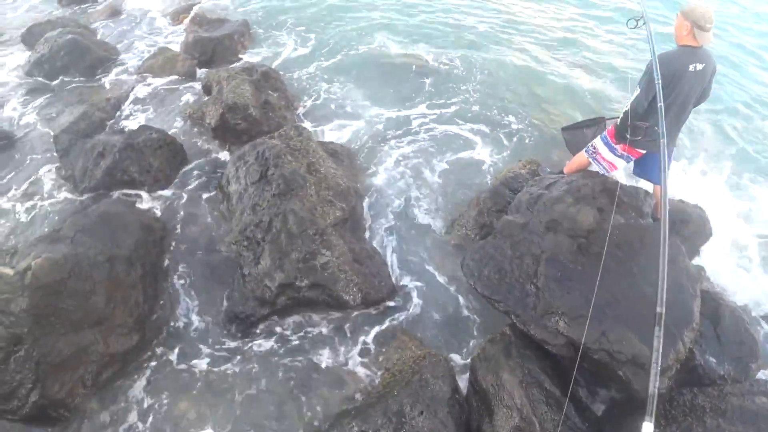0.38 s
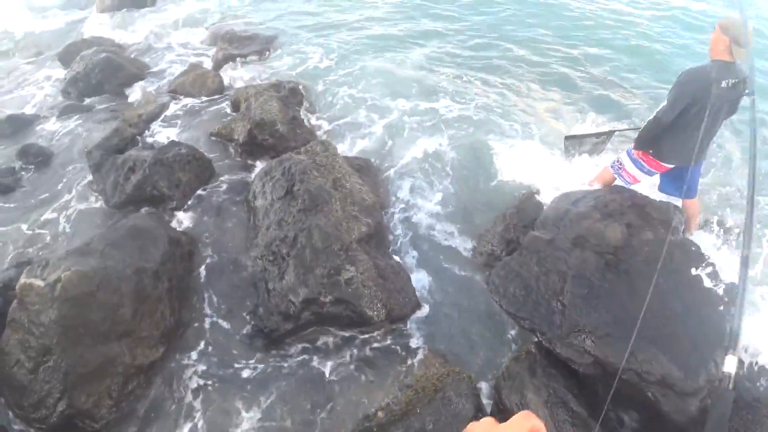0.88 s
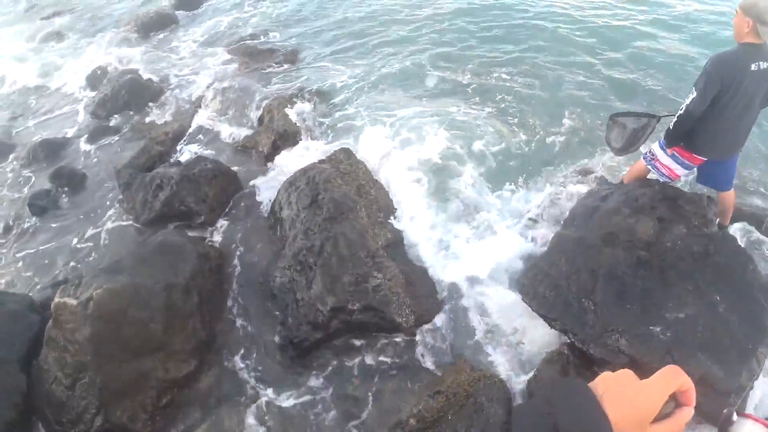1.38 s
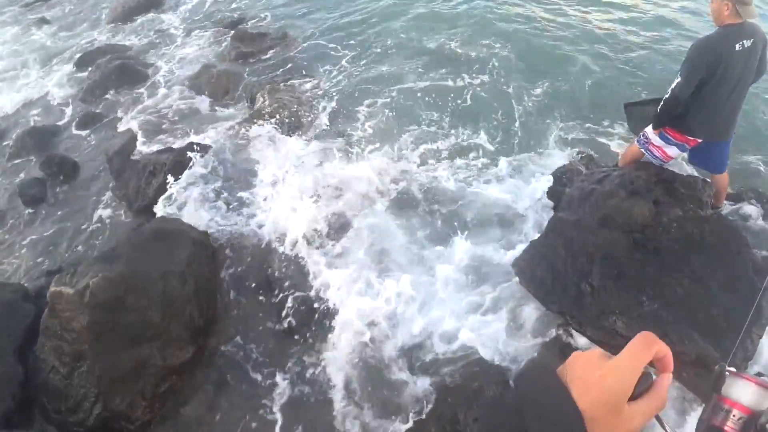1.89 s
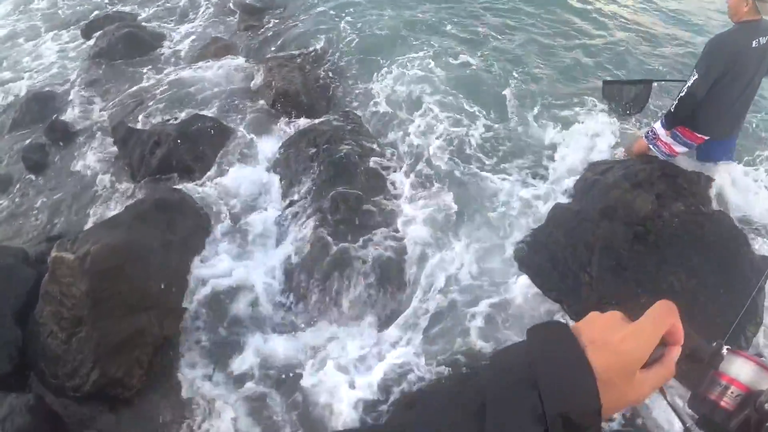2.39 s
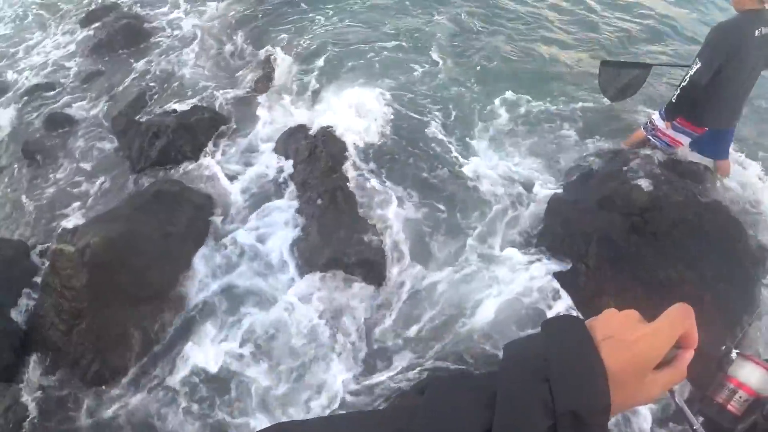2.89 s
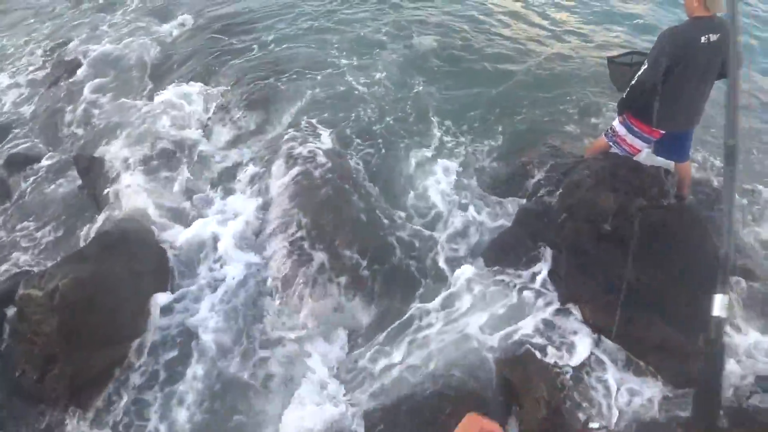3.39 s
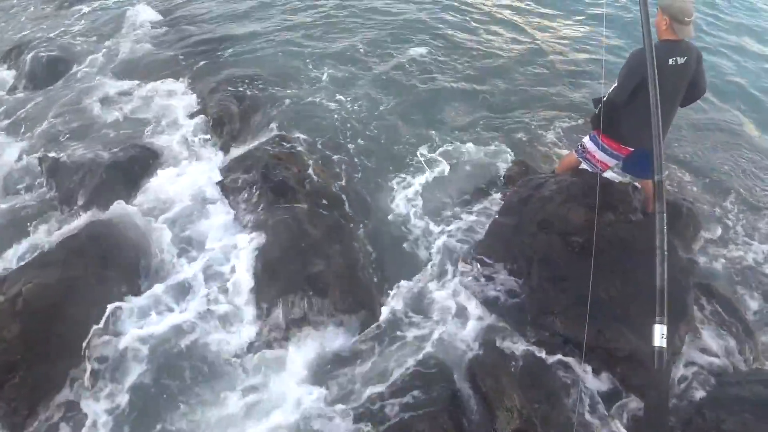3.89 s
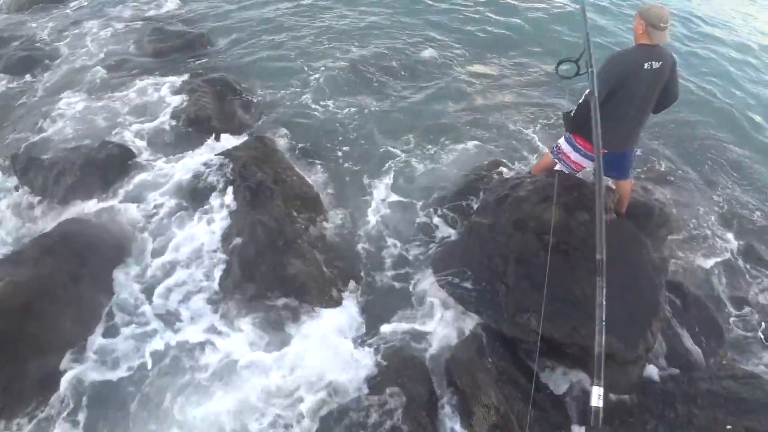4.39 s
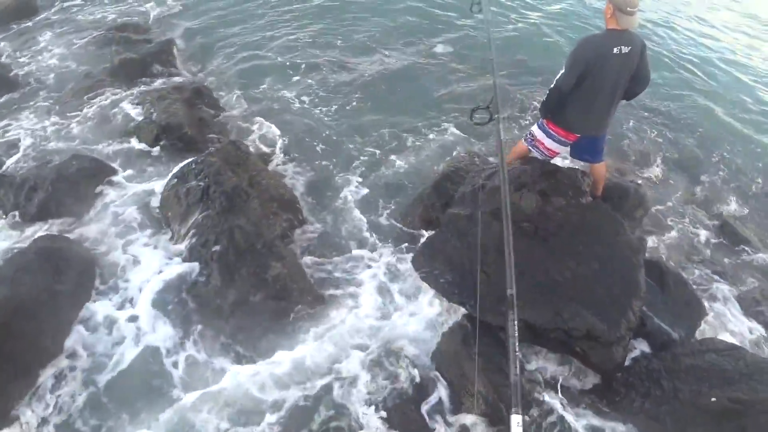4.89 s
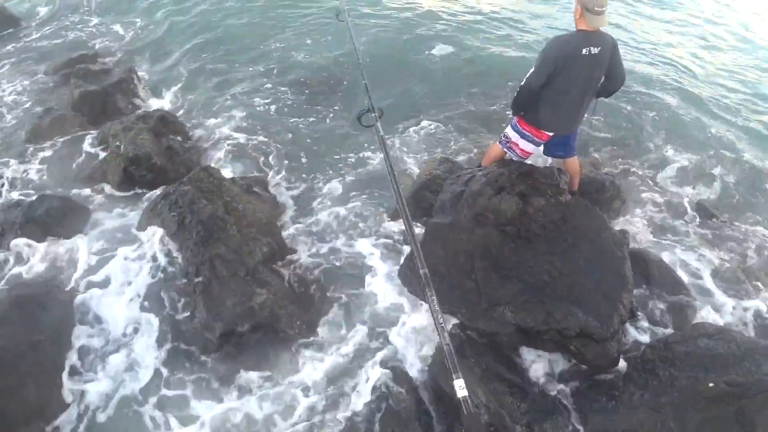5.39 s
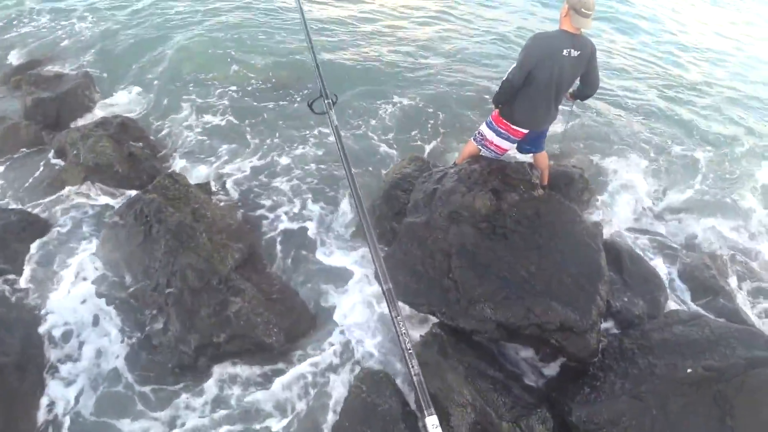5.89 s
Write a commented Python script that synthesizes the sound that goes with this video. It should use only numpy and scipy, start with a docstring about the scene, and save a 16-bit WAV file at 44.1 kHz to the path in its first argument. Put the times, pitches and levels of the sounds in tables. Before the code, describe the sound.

Close surf churns and fizzes among rocks over a smooth distant roar. It starts fairly quiet, builds within a second or so into splashy foam with short slaps, peaks near two seconds, surges again around three and a half, then settles. Soft knocks on the housing and one tiny drip come late. Outdoors, the sound is thin, boxy and resonant, with little bass and a wide, diffuse stereo spread.

```python
"""Surf washes and foams over shoreline rocks, heard by two microphones inside a small closed housing.
The water is random bubble bursts over smooth noise, in three bands; slaps are noise swells, a drop rings.
Fixed resonances of the housing colour the water; dull knocks on it are decaying sines.
Far surf is a smooth noise roar. The stereo circuit widens all but the knocks: left and right nearly oppose."""
import sys
import numpy as np
from scipy import signal
from scipy.fft import rfft, irfft, next_fast_len
from scipy.io import wavfile

SR = 44100
rng = np.random.default_rng(int(sys.argv[2]) if len(sys.argv) > 2 else 0)


def nominal_scale(level):
    """Amplitude ratio for a level in decibels (scalar or array-like)."""
    x = np.asarray(level, float) / 20
    return 10 ** x


def output_pcm(signal):
    """Save a mono or channel-first signal as 16-bit PCM at the path in sys.argv[1].

    Samples are clipped to [-1, 1] before scaling.
    """
    pcm = np.clip(np.atleast_2d(signal).T, -1, 1) * 32767
    wavfile.write(sys.argv[1], SR, np.round(pcm).astype(np.int16))


N = 265482
SIZE = next_fast_len(N + SR // 4)
HZ = np.maximum(np.arange(SIZE // 2 + 1) * SR / SIZE, 1)


def rms_one(x):
    """Scale to unit power."""
    return x / np.sqrt(np.mean(x ** 2) + 1e-20)


def cut(x, hz, kind):
    """Fourth-order Butterworth low- or high-pass."""
    return signal.sosfilt(signal.butter(4, hz, kind, fs=SR, output="sos"), x)


def drift(corner_hz):
    """Slow random curve of unit rms: noise at SR / 40 through a double one-pole low-pass."""
    pole = np.exp(-2 * np.pi * corner_hz * 40 / SR)
    coarse = rng.standard_normal(N // 40 + 2002)
    slow = signal.lfilter([1], [1, -2 * pole, pole ** 2], coarse)[2000:]  # drop the settling
    return np.interp(np.arange(N) / 40, np.arange(len(slow)), rms_one(slow))


def near_water(wash_db, foam_db, spray_db):
    """Big bubbles of the wash fill the low band, foam the middle, spray the top; all flicker partly together."""
    foam_from_hz, spray_from_hz = 1013, 3140
    together = drift(16)
    dull, bright = slaps()

    wash_gain = nominal_scale(wash_db + 0.65 * together + 0.5 * drift(30))
    foam_gain = nominal_scale(foam_db + 0.5 * together + 0.5 * drift(30))
    spray_gain = nominal_scale(spray_db + 0.71 * together + 0.69 * drift(40))

    wash = wash_gain * bursts(6000, spread_db=2.5, smooth=1.66) + dull
    foam = foam_gain * bursts(6000, spread_db=3, smooth=1.7) + dull
    spray = spray_gain * bursts(4000, spread_db=0.0, smooth=0.69) + bright

    wash = cut(wash, foam_from_hz, "low")
    foam = cut(cut(foam, foam_from_hz, "high"), spray_from_hz, "low")
    spray = cut(spray, spray_from_hz, "high")
    return wash + foam + spray


def bursts(per_s, spread_db, smooth):
    """Bubbles burst at random moments, sizes spread by spread_db, on the blur of countless smaller ones."""
    size_db = spread_db * np.minimum(rng.exponential(1, N), 4)
    sizes = nominal_scale(size_db) * rng.choice([-1, 1], N)
    born = rng.random(N) < per_s / SR
    blur = smooth * rng.standard_normal(N)  # smooth: rms relative to the bursts
    return rms_one(rms_one(sizes * born) + blur)


# slaps of water on rock, before band split and housing:
# [peak_s, level_db, rise_s, bright_re_dull_db]
ROCK_SLAPS = [(0.649, -48.5, 0.0097, -2), (1.090, -45.5, .010, -14), (1.133, -53, 0.008, 7),
              (1.194, -48.5, 0.011, -1), (1.467, -50.5, .004, 6), (1.538, -55, .014, 14.5),
              (1.62, -42, .008, 1), (2.093, -47, 0.004, 9), (2.116, -51, 0.0026, 12),
              (2.183, -48, 0.0031, 6), (2.893, -48.5, .008, -2)]


def slaps():
    """Each slap is a quick noise swell that dies within a few hundredths of a second; dull and bright part."""
    out = np.zeros((2, N))
    t = np.arange(SR // 8) / SR
    for peak_s, level_db, rise_s, bright_db in ROCK_SLAPS:
        u = t / rise_s
        swell = u * np.exp(1 - u) * rng.standard_normal(len(t))
        i = round((peak_s - rise_s) * SR)
        out[0, i:i + len(t)] += nominal_scale(level_db) * swell
        out[1, i:i + len(t)] += nominal_scale(level_db + bright_db) * swell
    return out


def drop():
    """A drop lands close by: a tiny bubble rings for a few cycles."""
    start_s, level_db, pitch_hz, rise_s = 4.8467, -43, 5130, 0.0008  # level before the housing
    out = np.zeros(N)
    t = np.arange(SR // 50) / SR
    u = t / rise_s
    i = round(start_s * SR)
    out[i:i + len(t)] = nominal_scale(level_db) * u * np.exp(1 - u) * np.sin(2 * np.pi * pitch_hz * t)
    return out


# resonances of the housing: [pitch_hz, width_hz, side_db, mid_db]
RESONANCES = [(610.4, 80, 25.5, 13), (832, 320, 26, 16), (1048, 167, 22.5, 13.5), (1180, 240, 21, -1.5),
              (1430, 630, 19, 4), (1609, 141, 18.5, 18), (1724, 185, 12.5, 11.5), (1940, 280, 16, 6.5),
              (2280, 370, 8, 3), (2642, 210, 9.5, 2.5), (3225, 200, 7.5, -5), (3870, 500, 0.5, -7),
              (4865, 430, 18.5, 13.5), (5277, 770, 12.5, 12), (5890, 1130, 7.5, 5.5), (6790, 1400, -1.5, 0),
              (8000, 4500, -13.5, -12)]
# phase by which the mid signal trails the side signal: [pitch_hz, lag_rad]
MID_PHASE_LAG = [(300, 1.7), (800, 1.6), (1200, 1.95), (1700, 1.85), (4500, 2.03), (10000, 1.78)]


def housing(water):
    """Side and mid each weigh the resonances in their own way; the ringing follows its cause."""
    seal_hz = 304
    hz, width_hz, *levels_db = np.transpose(RESONANCES)
    coarse_hz = HZ[::16]
    power = 1 / (1 + ((coarse_hz[:, None] - hz) / width_hz * 2) ** 2) ** 2
    side, mid = [np.interp(HZ, coarse_hz, np.sqrt(power @ nominal_scale(2 * db))) for db in levels_db]

    # folding the cepstrum gives the causal phase
    fold = irfft(np.log(side), SIZE)
    fold[SIZE // 2:] = 0
    causal = np.exp(2j * rfft(fold).imag)

    lag_hz, lag_rad = np.transpose(MID_PHASE_LAG)
    lag = np.interp(np.log(HZ), np.log(lag_hz), lag_rad)
    water = cut(water, seal_hz, "high")  # the seal keeps the bass out
    spectrum = rfft(water, SIZE) * causal
    return irfft(spectrum * [side, mid * np.exp(-1j * lag)], SIZE)[:, :N]


# dull knocks on the housing: [start_s, level_db, pitch_hz]
HOUSING_KNOCKS = [(.005, -60, 94), (.890, -64, 115), (3.331, -58, 140), (4.349, -46, 410),
                  (4.796, -48.5, 342)]


def knocks(cycles=1.9):
    """A soft low thump of a few cycles: a sine that swells at once and decays."""
    out = np.zeros(N)
    t = np.arange(SR // 8) / SR
    for start_s, level_db, pitch_hz in HOUSING_KNOCKS:
        u = t * pitch_hz / cycles * 3  # envelope peaks after cycles / 3
        i = round(start_s * SR)
        out[i:i + len(t)] += nominal_scale(level_db) * u * np.exp(1 - u) * np.sin(2 * np.pi * pitch_hz * t)
    return out


# spectral gain of far surf from all round: [pitch_hz, side_db, mid_db]
FAR_SPECTRUM = [(30, -13, -6.5), (91, -3.5, 5), (208, 10.5, 9.5), (480, 20, 15.5), (1110, 32.5, 20),
                (2860, 20.5, 17), (4300, 16.5, 12.5), (6160, 12, 10), (8750, 6.5, 8), (11100, 5.5, 9)]


def far_surf(far_db, rumble_db=-63, rumble_below_hz=350):
    """A smooth roar, unrelated in side and mid; its bass, from the whole shore, ignores far_db."""
    hz, *levels_db = np.transpose(FAR_SPECTRUM)
    gains = nominal_scale([np.interp(np.log(HZ), np.log(hz), db) for db in levels_db])
    noise = rng.standard_normal((2, N)) * nominal_scale(0.91 * drift(18.5))
    # both levels apply before the spectral gains
    roar = cut(noise * nominal_scale(far_db), rumble_below_hz, "high")
    rumble = cut(noise * nominal_scale(rumble_db), rumble_below_hz, "low")
    return irfft(rfft(roar + rumble, SIZE) * gains, SIZE)[:, :N]


# course of the water, both about their mean: [time_s, surface_churn_db, moving_weight_db]
WATER_COURSE = [(0.0, -6, -0.5), (0.45, -2.5, -1), (0.95, 0, 2), (1.15, 3, 1.5), (1.36, 2.5, -1.5),
                (1.46, 1.5, -1.5), (1.56, 5, -1.5), (1.8, 0, 2.5), (2.15, 6.5, 0), (2.28, 4.5, 4),
                (2.45, 0.5, 4), (2.95, 0.5, 0.5), (3.07, -1, 0), (3.2, 1, 4), (3.55, 3.5, 0.5),
                (3.95, 1.5, -1), (4.05, -1, -4.5), (4.7, -3.5, -4.5), (5.05, -3.5, -1), (5.6, -3.5, -1),
                (6.02, -5.5, -5.5)]


def scene():
    """Churn drives the spray, weight the wash, both the foam and far surf; side and mid give left and right."""
    time_s, *curves = np.transpose(WATER_COURSE)
    churn_db, weight_db = [np.interp(np.arange(N) / SR, time_s, c) for c in curves]
    # base levels before housing and far spectrum; slopes in dB per dB
    wash_db = -53.5 + weight_db
    foam_db = -47 + 0.41 * churn_db + 0.14 * weight_db
    spray_db = -48 + churn_db
    far_db = -63 + 0.43 * churn_db + 0.05 * weight_db

    water = near_water(wash_db, foam_db, spray_db) + drop()
    side, mid = housing(water) + far_surf(far_db)
    mid = mid + knocks()  # alike in both channels
    return np.array([mid + side, mid - side])


def top_cut(x):
    """Nothing passes above the cut-off."""
    return signal.sosfilt(signal.butter(12, 11940, fs=SR, output="sos"), x)


def record(dry):
    """A steep low-pass removes everything from cutoff_hz up."""
    cutoff_hz = 11030
    mix = irfft(rfft(dry, SIZE) * (HZ < cutoff_hz), SIZE)[:, :N]
    return top_cut(mix)


dry = scene()
out = record(dry)
output_pcm(out)
```